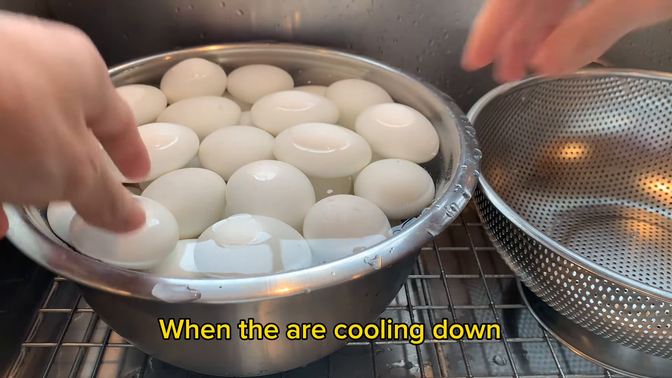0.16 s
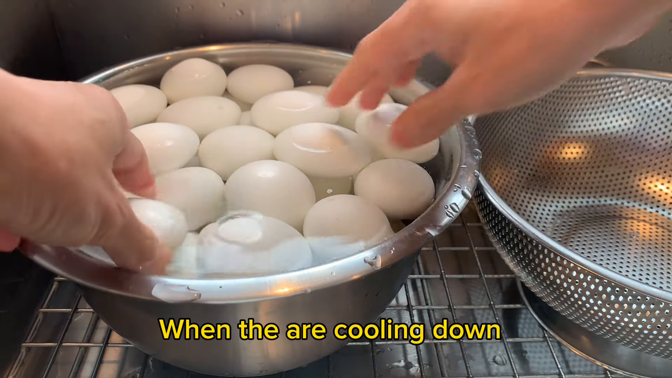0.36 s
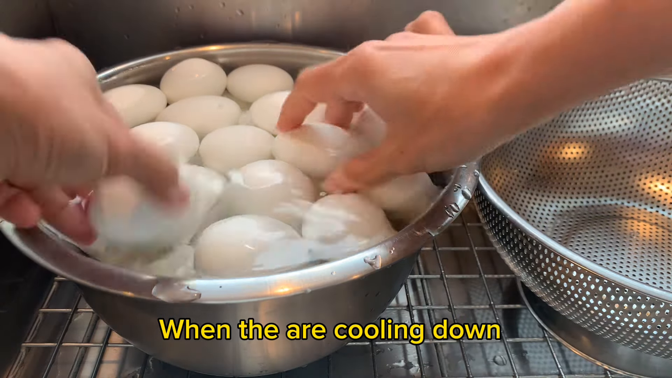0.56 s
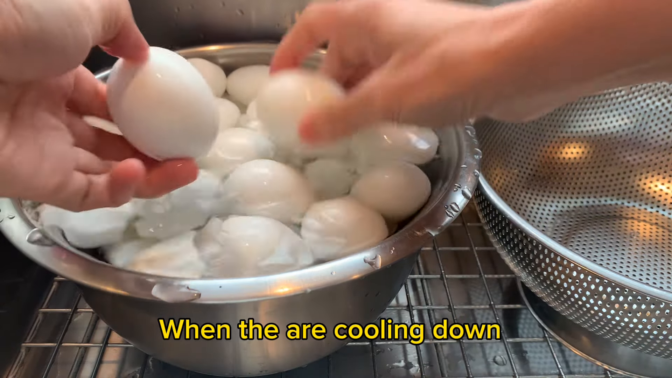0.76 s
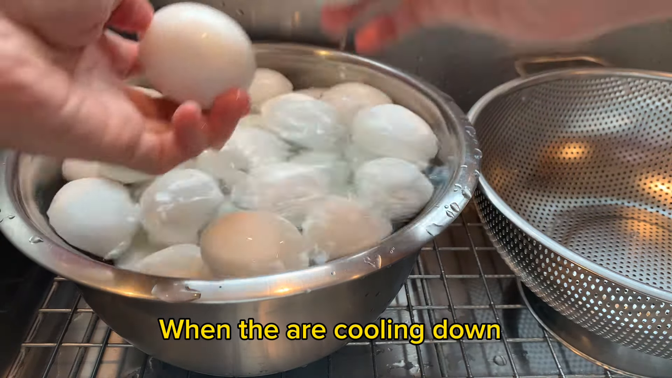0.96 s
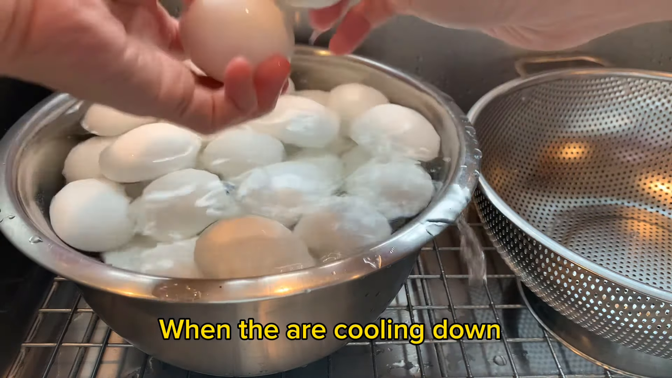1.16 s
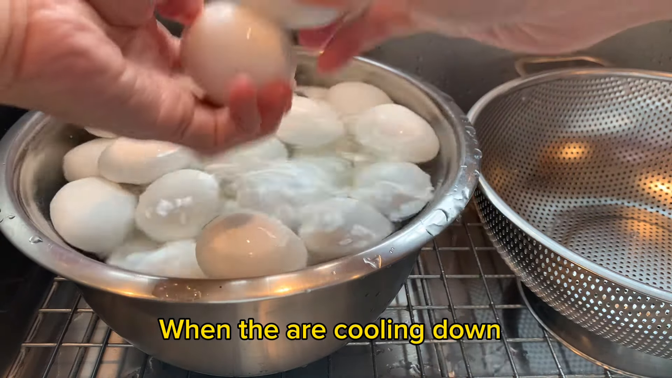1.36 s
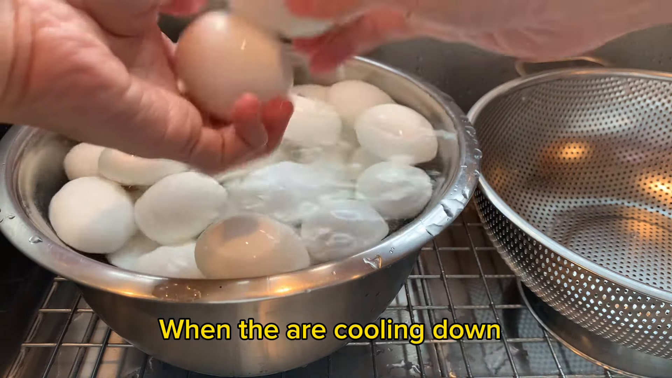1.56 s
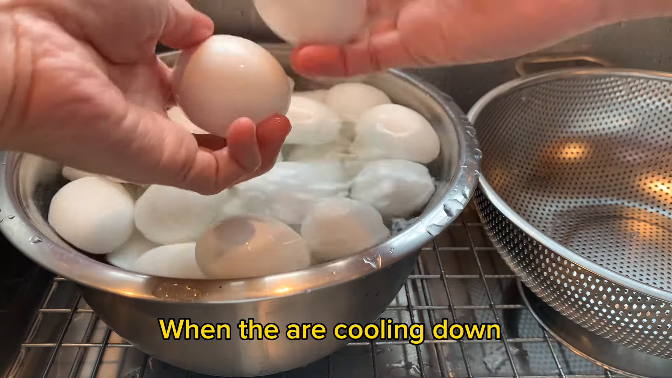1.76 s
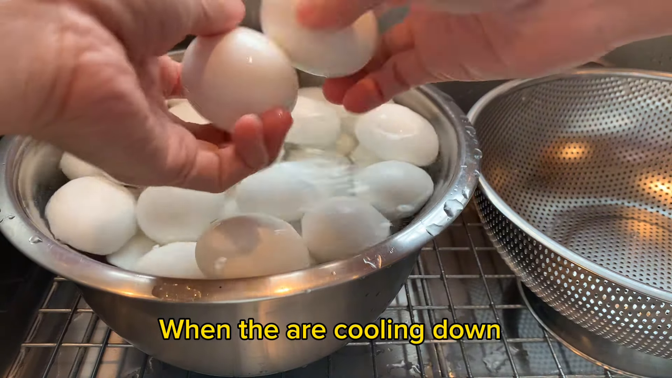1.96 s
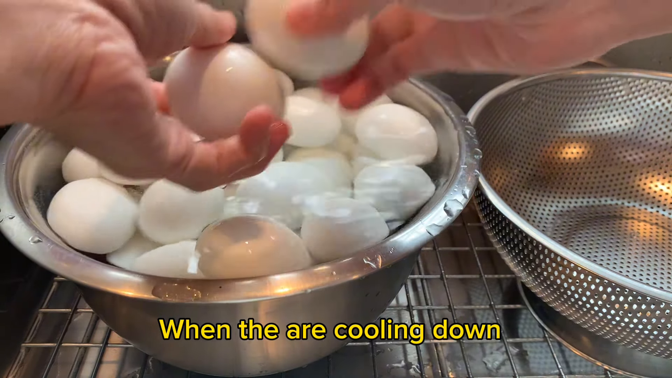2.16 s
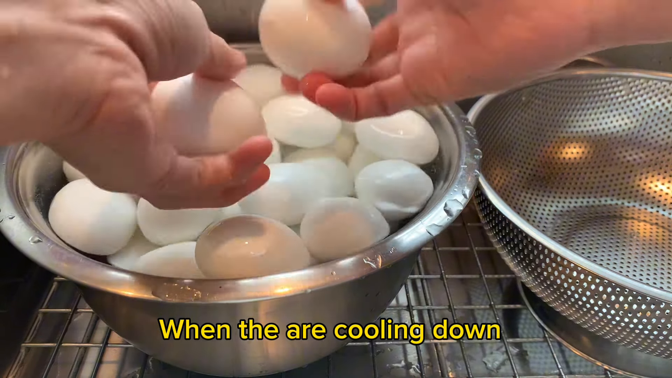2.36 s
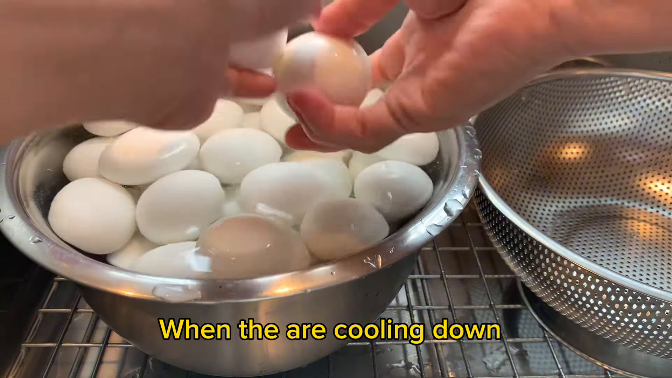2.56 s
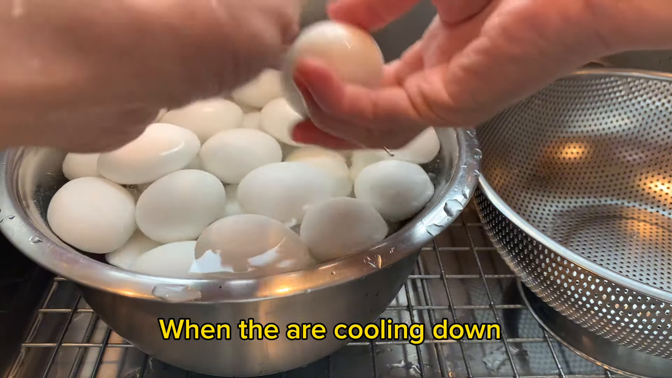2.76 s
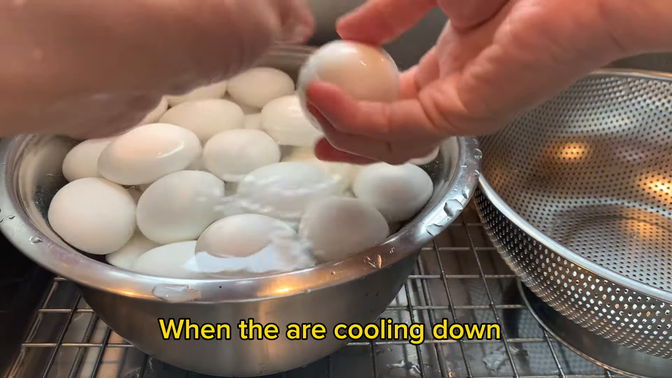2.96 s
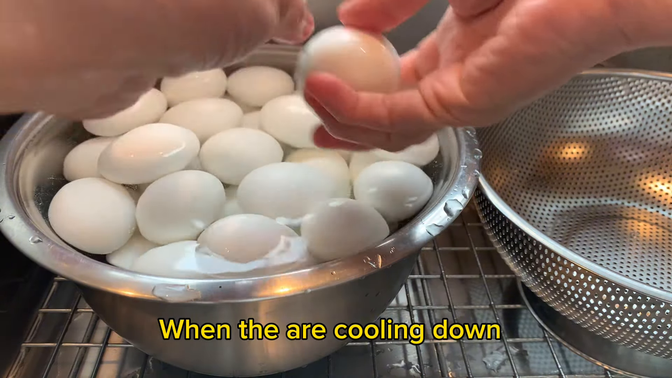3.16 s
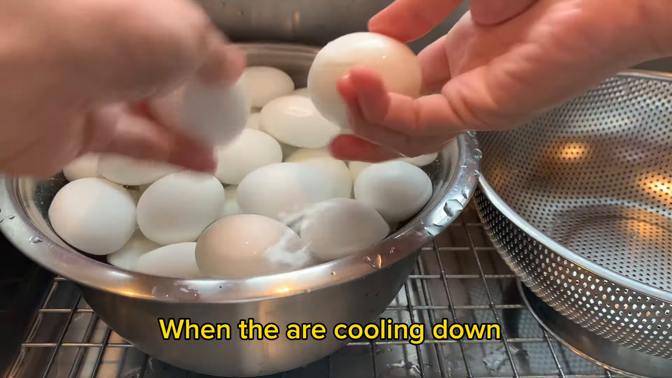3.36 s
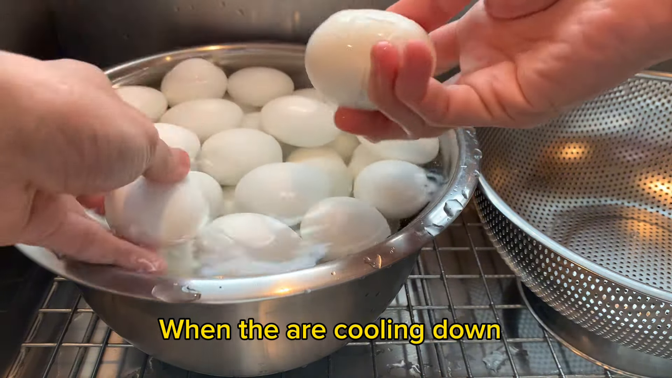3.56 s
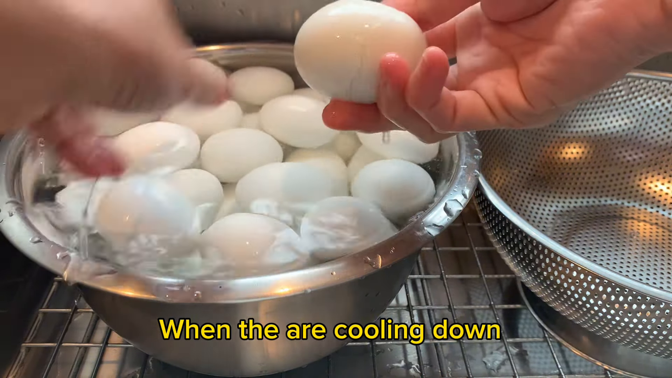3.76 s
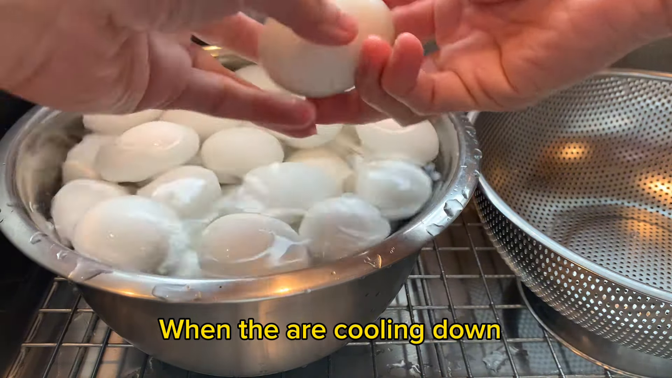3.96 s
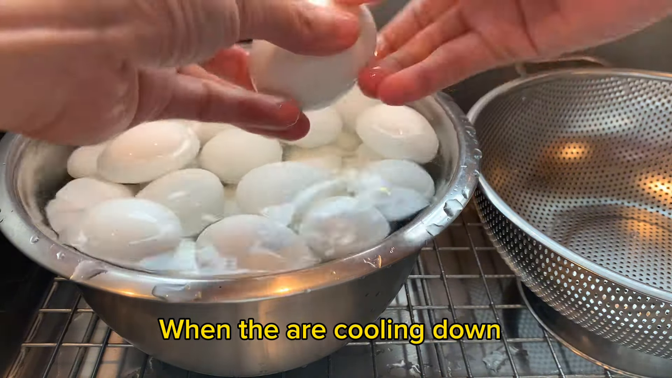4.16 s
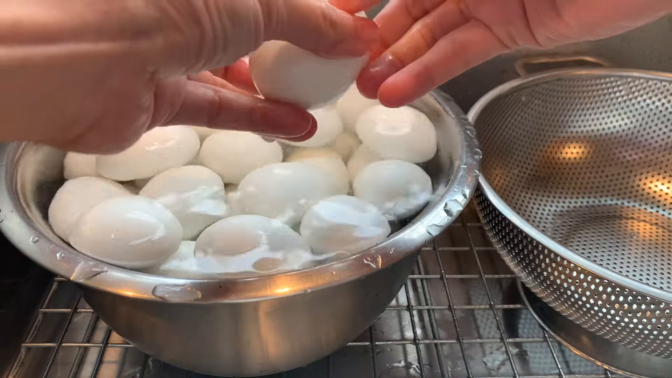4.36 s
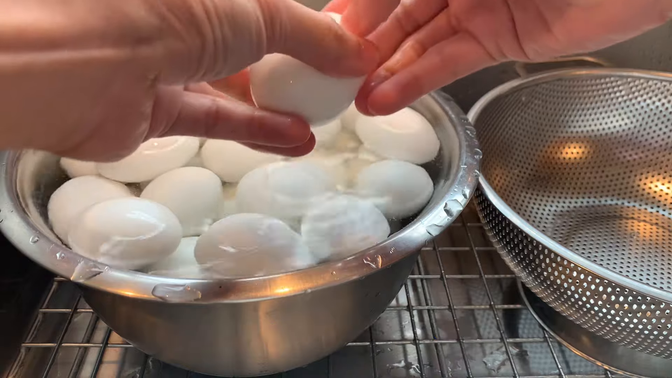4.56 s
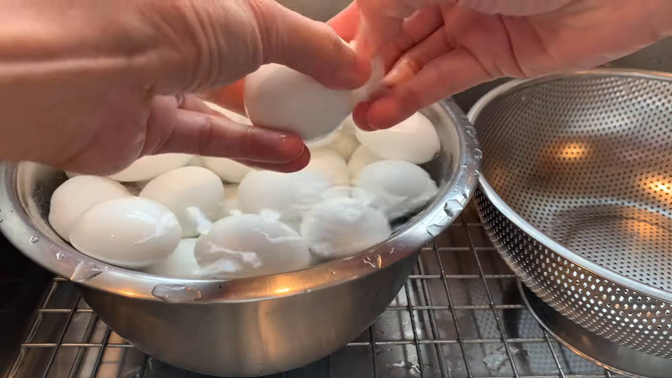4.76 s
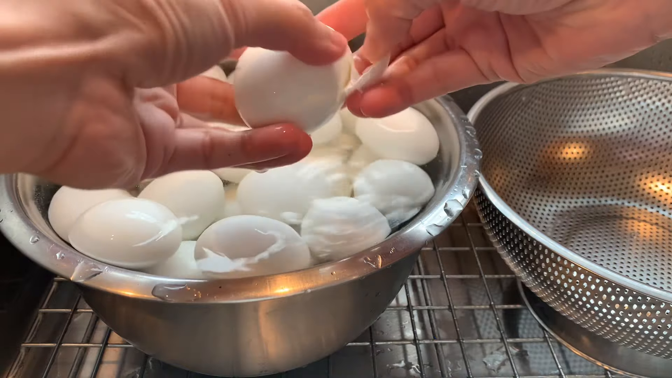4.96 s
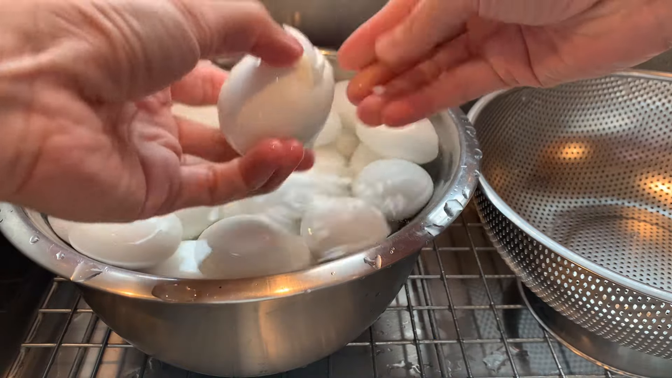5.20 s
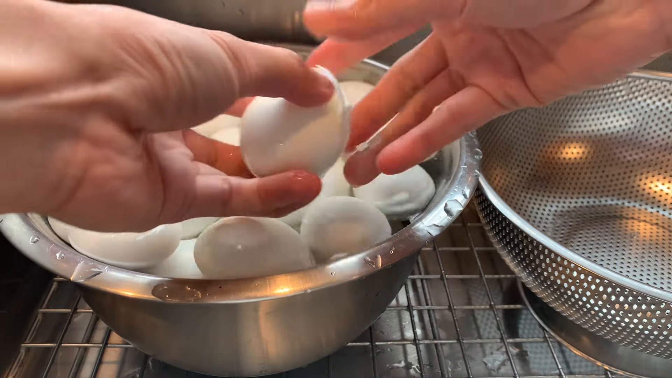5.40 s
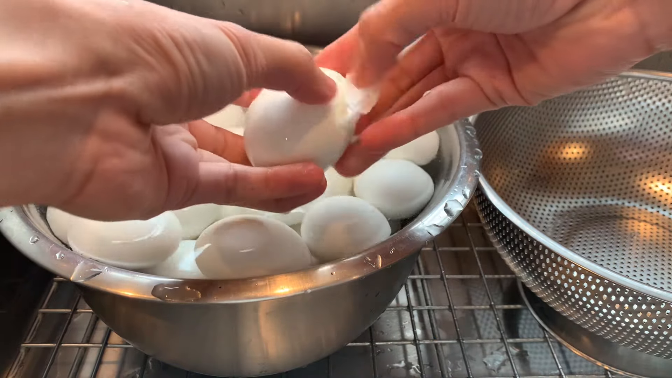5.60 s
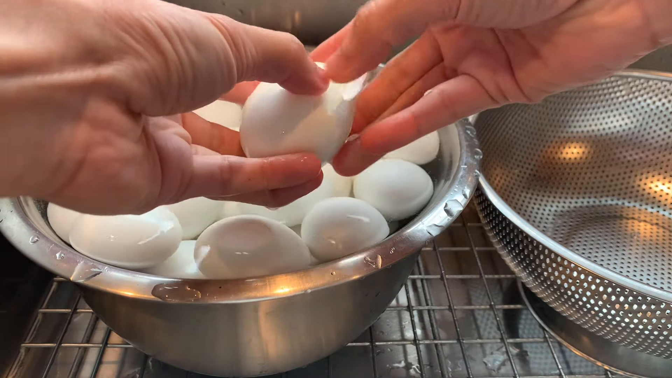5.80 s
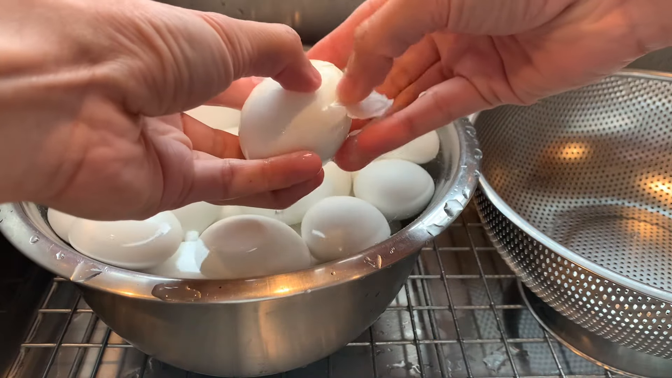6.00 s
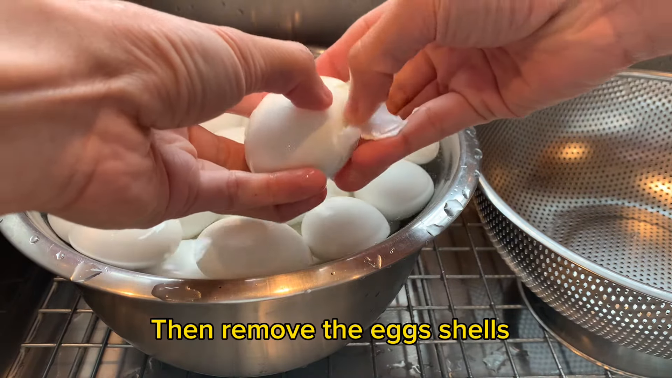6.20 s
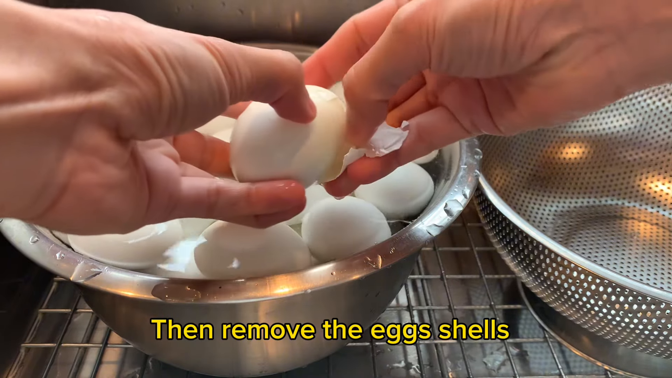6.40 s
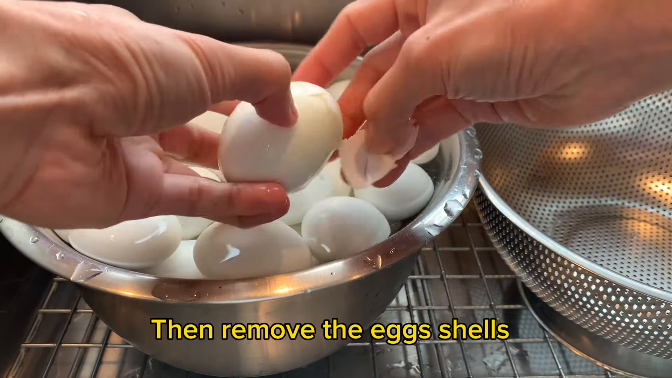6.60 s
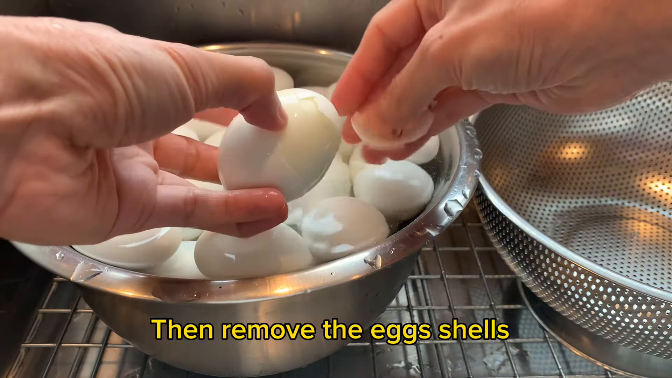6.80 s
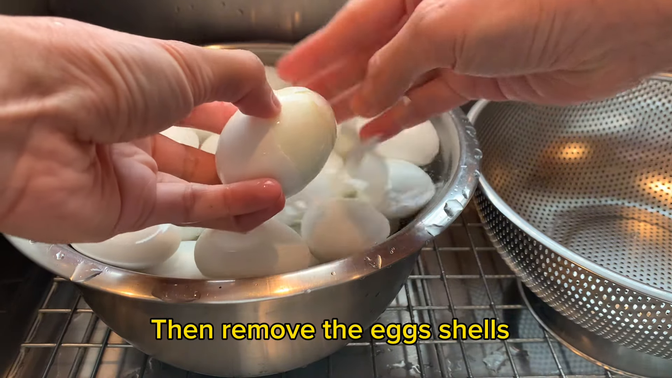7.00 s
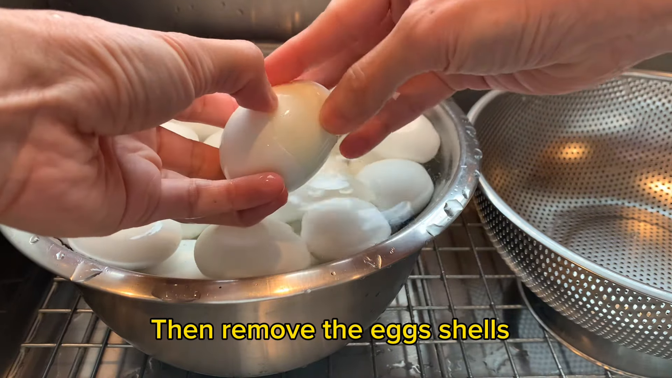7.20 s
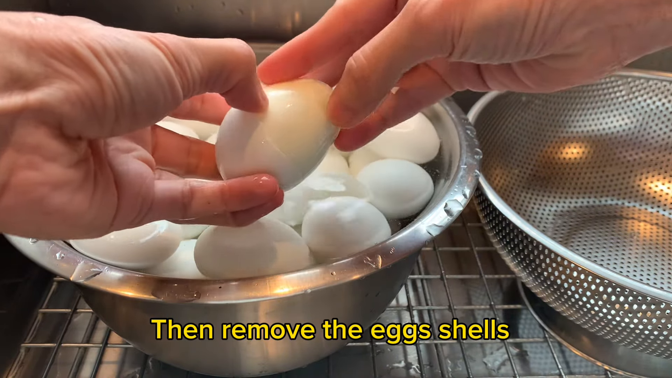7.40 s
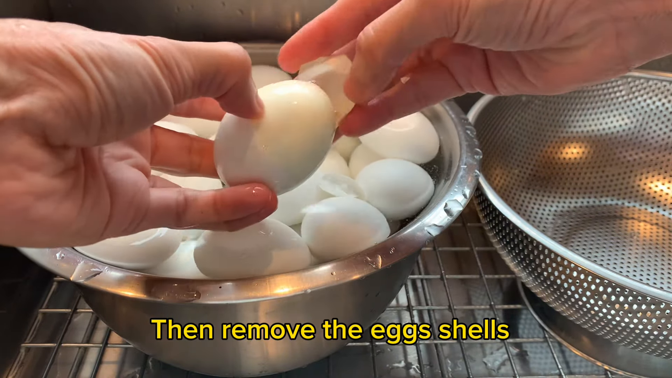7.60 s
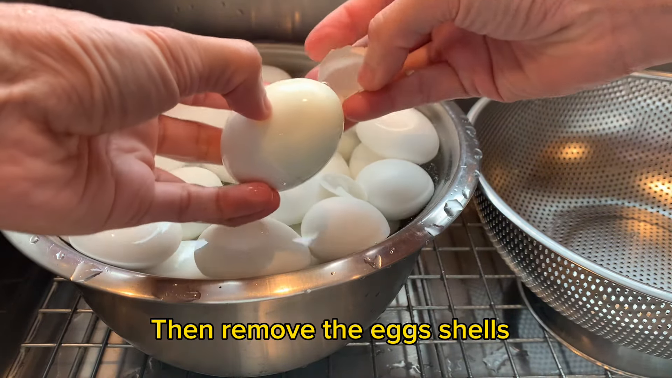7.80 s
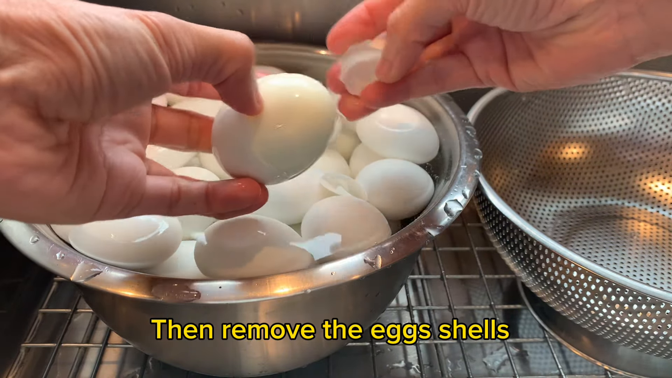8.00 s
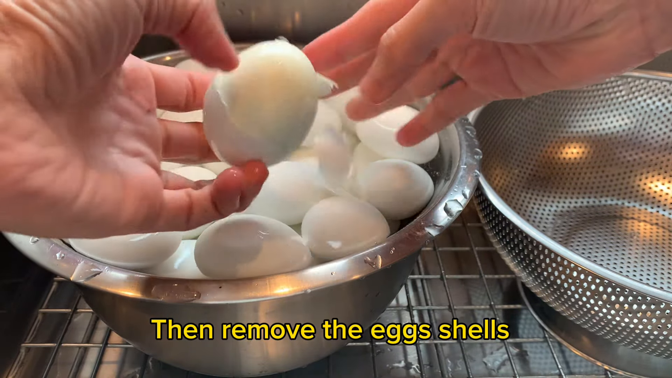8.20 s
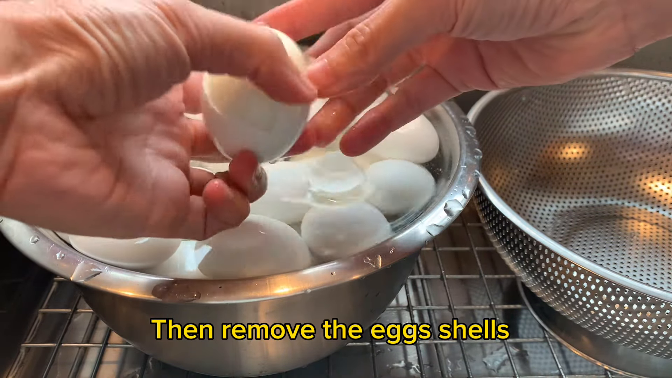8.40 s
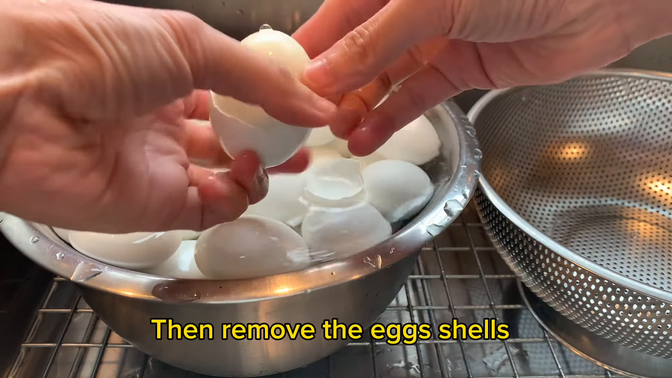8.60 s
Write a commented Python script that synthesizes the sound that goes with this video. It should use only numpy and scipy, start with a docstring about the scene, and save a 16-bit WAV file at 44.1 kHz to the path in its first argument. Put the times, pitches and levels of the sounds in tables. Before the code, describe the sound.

Close stereo sound at a kitchen sink. Hands stir water and boiled eggs in a steel bowl with soft sloshes and bumps, then nine sharp, crunchy knocks break a shell. An egg drops back with a low gulp, thump and faint metallic ring. After a brief lull, shell is squeezed and peeled in irregular bursts of bright crackles and snaps, over faint hum and air noise.

```python
"""A boiled egg is knocked nine times to break its shell, then squeezed and peeled: showers of tiny cracks,
snapping plates of shell and crackling membrane. Water sloshes as eggs are lifted from a steel bowl in a kitchen
sink: shaped noise, air bubbles that ring for a few cycles, and short bumps and splashes. The bowl rings once as
two fading tones. Random echoes stand for the sink and a small room, over steady hum, rumble and air noise."""
import sys
import numpy as np
from scipy import signal
from scipy.fft import rfft, irfft
from scipy.io import wavfile
from scipy.ndimage import uniform_filter1d

SR = 44100
rng = np.random.default_rng(int(sys.argv[2]) if len(sys.argv) > 2 else 0)


def to_wav(s):
    """Save 16-bit WAV."""
    ch = np.atleast_2d(s).T  # columns
    pcm = np.round(np.clip(ch, -1, 1) * 32767)  # PCM
    wavfile.write(sys.argv[1], SR, pcm.astype(np.int16))


N = 381465  # length of the scene [samples]

# tone colour of the firm egg under the shell: (frequency [Hz], level [dB])
EGG_BODY = [(150, -16.5), (500, -9), (900, -9), (1400, 1), (2200, 2.5), (2750, -1), (4500, -12.5),
            (9000, -15.5)]
# tone colour of fine drops on the water surface: (frequency [Hz], level [dB])
SPATTER_COLOUR = [(400, -8), (900, -7), (1800, -9), (3000, -16), (4500, -11), (7000, -21.5), (14000, -23),
                  (16000, -52)]


def undb(db):
    """Turn decibels into a plain multiplier."""
    return 10 ** (np.asarray(db) / 20)


def unit(x):
    """Scale to rms 1."""
    return x / np.sqrt(np.mean(x ** 2) + 1e-20)


def response(points, size=1024):
    """Make a filter of unit energy with the given spectrum that never sounds before its input (minimum phase)."""
    hz, db = np.transpose(points)
    bins = np.maximum(np.arange(size // 2 + 1) * SR / size, 1)
    level_db = np.interp(np.log(bins), np.log(hz), db)
    # folding the cepstrum onto its first half puts the energy as early as possible
    cepstrum = irfft(np.log(undb(level_db)))
    cepstrum[1:size // 2] *= 2
    cepstrum[size // 2 + 1:] = 0
    h = irfft(np.exp(rfft(cepstrum)))
    return h / np.linalg.norm(h)


def colour(x, points):
    """Filter x by a spectrum."""
    return signal.oaconvolve(x, response(points))[:len(x)]


def add(track, s, sound):
    """Lay a sound into a track at time s [s]."""
    i = int(s * SR)
    track[i:i + len(sound)] += sound[:N - i]


def grains(n, per_s, scatter_db):
    """Random tiny impulses of uneven size."""
    chance, size, strength = rng.random(n), rng.standard_normal(n), rng.standard_normal(n)
    happens = chance < per_s / SR
    return happens * size * undb(scatter_db * np.clip(strength, -2, 2))


def burst(x, db):
    """Give a short sound the energy of 8 ms at the level db."""
    return x / np.linalg.norm(x) * np.sqrt(.008 * SR) * undb(db)


def fracture(t, decay_s, rise_s, scatter_db=2):
    """A run of micro-cracks that swells and dies out."""
    swell = 1 - np.exp(-(t / rise_s) ** 2)
    return grains(len(t), 20000, scatter_db) * np.exp(-t / decay_s) * swell


def crunch(cracks, bright_db):
    """Colour cracks as breaking shell; thin splinters get more treble than thick ones."""
    # tone colour of crunching shell: (frequency [Hz], level [dB])
    crunch_colour = [(2700, -38.5), (5000, -11.5), (6500, 1), (8000, 8), (9800, 3.5), (11000, 6),
                     (11900, -6), (13000, 6), (14300, -0.5), (15600, -20), (16500, -30)]
    hz, db = np.transpose(crunch_colour)
    treble = np.clip((hz - 9000) / 4000, 0, 1)  # none below 9 kHz, all of it above 13 kHz
    return colour(cracks, np.transpose([hz, db + bright_db * treble]))


def knocks(crunch_db=0.0, plate_db=1, body_db=-2, thud_db=-6.0, crush_rise_s=0.0032, give_db=11, give_s=0.00059):
    """Each knock crushes a patch of shell until it caves in, and briefly rings two modes of the firm egg under it."""
    # knocks, levels before the gains above; plate and body are relative to the crunch, upper mode to the egg's:
    # (time [s], crunch [dB], brightness [dB], plate ring [dB], egg body [dB], egg mode [Hz], upper mode [Hz],
    # upper mode [dB], delay until the shell caves in [s], crush decay [s])
    knock_list = [(1.15, -13, -4, -9.5, -23.5, 1690, 2140, -5, 0.0029, 0.0043),
                  (1.3783, -22.5, 7, -9.5, -15, 1370, 2000, 10, 0.0031, 0.0065),
                  (1.5786, -23, 7.5, -11.5, -15, 1557, 2210, -2, 0.003, 0.0032),
                  (1.986, -30.5, 7.5, -9.5, -15, 1075, 2050, -2.5, 0.0038, 0.018),
                  (2.2012, -22.5, 7, -12, -16, 1082, 1320, -1, 0.0024, 0.0015),
                  (2.54, -36.5, 7.5, -9.5, -12, 1470, 2030, -9, 0.0068, 0.0044),
                  (2.8073, -23.5, 5.5, -12.5, -10.5, 954, 1603, 4, 0.00437, 0.011),
                  (3.0335, -23.5, 5, -17, -10, 1032, 1630, -8, 0.0026, 0.00059),
                  (3.2272, -27, 11, -27, -11, 1026, 1310, -4.5, 0.0037, 0.015)]
    # tone colour of the plates of shell under a knock: (frequency [Hz], level [dB])
    knock_plate = [(1500, -7), (2800, 3), (3800, 11), (5000, 13), (6000, 11), (7500, -8), (10000, -28.5)]
    egg_ring_s = .0024
    out, t = np.zeros(N), np.arange(4096) / SR
    for s, db, bright, plate, body, hz, upper_hz, upper_db, caves_s, crush_s in knock_list:
        caving_in = 1 + undb(give_db) * np.exp(-((t - caves_s) / give_s) ** 2)
        cracks = fracture(t, crush_s, crush_rise_s) * caving_in
        modes = np.sin(2 * np.pi * hz * t) + undb(upper_db) * np.sin(2 * np.pi * upper_hz * t)
        ring = modes * np.exp(-t / egg_ring_s) * (1 - np.exp(-t / crush_rise_s))
        add(out, s, burst(crunch(cracks, bright), db + crunch_db))
        add(out, s, burst(colour(cracks, knock_plate), db + plate + plate_db))
        add(out, s, burst(ring, db + body + body_db))
        add(out, s, burst(colour(cracks, EGG_BODY), db + body + thud_db))
    return out


def plate_pitch(s):
    """Pitch [Hz] of the loose plate of shell at time s [s]."""
    # how the plate's pitch moves during the peeling: (time [s], pitch [Hz])
    pitch_points = [(1.25, 5410), (4.45, 3995), (4.63, 3920), (4.69, 3670), (4.78, 4160), (4.86, 4420),
                    (5.6, 4700), (6.25, 4280), (6.42, 4040), (6.55, 3920), (7.06, 4090), (7.4, 4840),
                    (7.47, 4100), (7.65, 4050), (8.23, 4400)]
    return np.interp(s, *np.transpose(pitch_points))


def snaps(crunch_db=0, plate_db=6.5, body_db=0, first_db=0, size_spread=0.026, uneven_db=1.0):
    """A plate of shell gives with one sharp break, then splinters; size and ragged shape set its pitch and colour."""
    # loud snaps, levels before the gains above; plate and body are relative to the crunch:
    # (time [s], crunch [dB], brightness [dB], plate ring [dB], egg body [dB], splintering decay [s])
    snap_list = [(1.295, -36.5, 17, -23, -34, 0.0023), (1.348, -51, 1, -4, -28, .001),
                 (2.648, -52.5, 8, -15, -27.5, .003), (3.419, -59, 19, -36, -36.5, 0.0011),
                 (3.484, -36.5, 19.5, -31.5, -28.5, 0.00074), (4.448, -58, 16, -18, 15.5, 0.0015),
                 (4.494, -52.5, 6, -16, 1, 0.0059), (4.625, -43.5, 10, -6, -12, .002),
                 (4.634, -33.5, 17, -15, -19, 0.0017), (4.686, -46, 0, 1.5, -22, 0.004),
                 (4.74, -48.5, 17, -5, -1, 0.0022), (4.766, -23, 0, -10, -16, 0.0067),
                 (4.772, -25.5, -7, -3.5, -19.5, 0.015), (4.78, -32, 12, -7, -13, 0.0025),
                 (4.794, -24.5, 5, -25, -16, 0.0069), (4.816, -32, 0, -28, -20, 0.00092),
                 (4.852, -34, -5, -13, -12.5, 0.0011), (4.86, -37.5, 9, -12, -24, 0.0022),
                 (4.951, -35.5, 11, -22, -21, 0.0029), (4.968, -35, 10, -22, -19, 0.0023),
                 (4.976, -37.5, 5, -26, -19.5, 0.0012), (4.99, -32.5, 13, -32, -26, 0.0048),
                 (4.997, -31, 11, -33, -22.5, 0.033), (5.036, -35, 24, -35, -28, 0.002),
                 (5.044, -35, 28, -37, -35, 0.00096), (5.104, -36, 16, -25, -24, 0.012),
                 (5.198, -45.5, 10, -20, -22, 0.0023), (5.216, -40, 5, -17.5, -20, 0.00054),
                 (5.586, -40, 27, -16, -35, 0.0017), (5.639, -29, 0, -13, -21, 0.0022),
                 (5.797, -53.5, 7, -21, -25, 0.003), (5.926, -51, 3, -18, -12.5, 0.0022),
                 (6.254, -47.5, 9, -5.5, -28, 0.0011), (6.375, -42, -1, -4.5, -10, 0.0016),
                 (6.392, -29.5, -2, -8.5, -17.5, 0.0013), (6.414, -31.5, 2, -3.5, -40, 0.00049),
                 (6.47, -53.5, -1, 6, -21, .001), (6.489, -38.5, 2, -21, -6, 0.0017),
                 (6.529, -28, -8, -14.5, -17, 0.011), (6.545, -21.5, 9.5, -25.5, -26, 0.0048),
                 (6.65, -32, 11, -23, -13.5, 0.017), (6.669, -32.5, -39, -23, -32, 0.0033),
                 (6.807, -35, 7, -45, -31, 0.00087), (6.873, -42, -5, -33, -26, .0015),
                 (6.91, -44, 1, -20.5, -11.5, 0.001), (7.062, -33.5, 3.5, -12.5, -15.5, 0.0056),
                 (7.258, -49.5, -8.5, -5.5, -26.5, 0.0014), (7.339, -50.5, 5, -13.5, -34, 0.0017),
                 (7.38, -50.5, 13, -5.5, -26, 0.00077), (7.404, -51, -1, 0.5, -30, 0.00087),
                 (7.427, -48, 10, -6.5, -36, 0.001), (7.443, -44.5, 10, -4, -34, 0.00093),
                 (7.456, -31, 11, -10, -36, 0.0007), (7.482, -33.5, 13, -37, -11, 0.0048),
                 (7.492, -29.5, 17, -32, -27, 0.00079), (7.498, -35, 7, -37, -9.5, 0.0018),
                 (7.623, -36, 15, -33, -24, 0.0015), (7.636, -42, 14, -3.5, -30, 0.0039),
                 (7.655, -43, 10, -10, -22, .001), (7.663, -47, 16, -8, -31, 0.0017),
                 (7.712, -38, 14, -20, -8, 0.0058), (7.747, -35.5, 10, -7.5, -31, 0.0057),
                 (7.777, -48.5, 6, -7.5, -30, .001), (7.851, -42, 6, -14, -22, 0.0007),
                 (7.893, -44, 1, -35, -22, 0.0012), (7.931, -38.5, 7, -8.5, -16.5, 0.02),
                 (7.955, -38.5, 7, -11, -25, .002), (8.052, -47.5, 3, -17, -14, .001),
                 (8.087, -46.5, 12, -28, -22, .0007), (8.229, -36.5, 2, -3.5, -6.5, 0.0028),
                 (8.27, -48.5, 0, -10, -12, 0.0028)]
    # tone colour of a ringing plate: (multiple of the plate's pitch, level [dB])
    plate_colour = [(.4, -26), (.68, -22), (.79, -9), (.88, 5), (1, 9), (1.25, 6), (1.7, -12), (2.4, -45)]
    out, t = np.zeros(N), np.arange(2048) / SR
    shape_hz = np.geomspace(700, 16000, num=24)
    for s, db, bright, plate, body, decay_s in snap_list:
        size = rng.uniform(-1, 1)
        cracks = fracture(t, decay_s, 0.00019)
        cracks[20] += undb(first_db) * np.linalg.norm(cracks[:128])  # the sharp break
        ragged_db = uneven_db * rng.standard_normal(len(shape_hz))
        cracks = colour(cracks, np.transpose([shape_hz, ragged_db]))
        pitch = plate_pitch(s) * np.exp(-size_spread * size)  # larger plates ring lower
        shard = np.array(plate_colour) * [pitch, 1]
        add(out, s, burst(crunch(cracks, bright), db + crunch_db))
        add(out, s, burst(colour(cracks, shard), db + plate + plate_db))
        add(out, s, burst(colour(cracks, EGG_BODY), db + body + body_db))
    return out


def tugging(lead_s=.1):
    """Each tug builds, holds in uneven jerks and lets go; gives the strength of the crackle and of the plate ring."""
    # tugs that tear shell from its membrane; the first two rows are the ringing tail of the first knock;
    # levels before the gains in peeling(): (start [s], length [s], crackle [dB], plate ring [dB])
    tug_list = [(1.147, 0.087, -53, -44.5), (1.26, 0.11, -63, -46.5), (4.412, 0.15, -57, -63.5),
                (4.606, 0.044, -36.5, -41), (4.65, 0.046, -48, -45), (4.752, 0.05, -36, -38.5),
                (4.808, 0.18, -48, -59), (4.945, 0.11, -40.5, -49.5), (5.085, 0.058, -38, -47),
                (5.574, 0.095, -36.5, -43), (5.672, 0.034, -52, -57), (5.88, 0.046, -42.5, -54),
                (6.137, 0.1, -53.5, -62.5), (6.295, 0.068, -45, -49), (6.393, 0.11, -42.5, -39),
                (6.531, 0.02, -36, -29), (6.663, 0.007, -28, -38.5), (6.756, 0.11, -47.5, -61.5),
                (7.38, 0.06, -49, -59), (7.446, 0.067, -39, -39.5), (7.528, 0.16, -47.5, -55.5),
                (7.618, 0.062, -31, -40.5), (7.679, 0.094, -36.5, -44.5), (7.795, 0.189, -43, -48.5),
                (8.007, 0.126, -45.5, -54), (8.23, 0.055, -82, -47.5)]
    build_s, release_s = 0.013, 0.0041
    jerks_per_s, jerk_db = 110, 4
    t, tracks = np.arange(SR // 2) / SR - lead_s, np.zeros((2, N))
    for s, length, crackle_db, ring_db in tug_list:
        before, after = np.maximum(-t, 0), np.maximum(t - length, 0)
        grip = np.exp(-before / build_s - after / release_s)
        for track, db in zip(tracks, (crackle_db, ring_db)):
            add(track, s - lead_s, undb(db) * grip)
    knots = np.arange(0, N, SR / jerks_per_s)
    jerks = np.interp(np.arange(N), knots, jerk_db * rng.uniform(-2, 1.7, len(knots)))
    return tracks * unit(undb(jerks))


def slips(strength, pitch, ring_cycles=3.5):
    """A random run of tiny flakes coming free, each ticking at the pitch of its moment."""
    out, t = np.zeros(N), np.arange(256) / SR
    sizes = unit(grains(N, per_s=850, scatter_db=4.5)) * strength
    for i in np.flatnonzero(np.abs(sizes) > 1e-4):  # skip the faintest
        cycles = pitch[i] * t
        tick = np.sin(2 * np.pi * cycles) * np.exp(-2 * cycles / ring_cycles)
        add(out, i / SR, sizes[i] * tick / np.linalg.norm(tick))
    return out


def peeling(crackle_db=-9, plate_db=-4.5, body_db=-22, bright_db=2, lowest_hz=3650, flake_scatter_db=4):
    """The membrane lets go in slips: tiny flakes tick brightly, larger ones ring the loose plate and the egg."""
    pull, ring = tugging()
    small = unit(grains(N, 890, flake_scatter_db)) * pull
    low = slips(ring, rng.uniform(900, 2100, N), ring_cycles=1.5)
    large = slips(ring, plate_pitch(np.arange(N) / SR) * rng.uniform(.85, 1.35, N))
    highpass = signal.butter(6, lowest_hz, "highpass", fs=SR, output="sos")
    large = signal.sosfilt(highpass, large)
    return undb(crackle_db) * crunch(small, bright_db) + undb(plate_db) * large + undb(body_db) * low


def plops(plop_s=0.006, splash_s=0.0072):
    """Mostly wet eggs nudging each other or the bowl: a short pip or a low thump, and a small splash."""
    # nudges, bumps and drops falling back; at 3.566 s a snap of shell:
    # (time [s], pip or thump level [dB], pitch [Hz], splash level [dB])
    plop_list = [(0.355, -45, 1430, -53), (0.377, -38.5, 136.4, -70), (.604, -52, 2270, -55),
                 (0.817, -47.5, 3140, -63), (0.841, -58, 3450, -51.5), (.861, -41, 3000, -55),
                 (0.866, -43.5, 2500, -64), (0.933, -53, 1400, -52), (0.964, -47, 145, -51),
                 (0.987, -44, 120, -49), (1.032, -49, 115, -81), (1.315, -38.5, 125, -67),
                 (1.346, -45.5, 133.6, -75), (3.566, -33, 4560, -41.5), (3.633, -54, 1530, -57),
                 (3.732, -61, 1380, -51), (3.808, -45, 1780, -37.5), (3.825, -42, 121, -65),
                 (3.877, -50, 1905, -36.5), (3.904, -30.5, 138, -70), (3.922, -49, 1510, -41),
                 (3.949, -32, 128.3, -77), (3.975, -45, 868, -38.5), (4.03, -50.5, 1530, -47),
                 (4.408, -64, 3740, -47)]
    out, t = np.zeros(N), np.arange(4096) / SR
    onset = 1 - np.exp(-t / 0.000095)
    for s, db, hz, splash_db in plop_list:
        # low thumps last longer than high pips; plop_s holds at 1500 Hz
        decay_s = plop_s * (1500 / hz) ** 0.67
        pip = np.sin(2 * np.pi * hz * t) * np.exp(-t / decay_s)
        splash = colour(rng.standard_normal(len(t)) * np.exp(-t / splash_s), SPATTER_COLOUR)
        add(out, s, (undb(db) * pip + undb(splash_db) * splash) * onset)
    return out


def gulps(swell_cycles=0.67, glide=.04):
    """Water closes over an egg: a pocket of air swells, rings for a few cycles and rises in pitch."""
    # gulps of trapped air: (time [s], peak level [dB], starting pitch [Hz])
    gulp_list = [(0.387, -44.5, 240), (0.53, -61, 201), (0.69, -53.5, 290), (0.945, -42, 423),
                 (0.968, -50, 315), (0.99, -53, 230), (1.041, -47, 187), (1.102, -52, 340),
                 (3.82, -36, 205), (3.833, -31, 324), (3.843, -44, 450), (3.885, -44, 336),
                 (3.932, -48, 454), (3.958, -46, 298), (4.016, -41.5, 267), (4.058, -43, 201),
                 (4.161, -50, 236.5)]
    out, t = np.zeros(N), np.arange(8192) / SR
    for s, db, hz in gulp_list:
        cycles = hz * t
        age = cycles / swell_cycles
        swell = age * np.exp(1 - age)
        add(out, s, undb(db) * swell * np.sin(2 * np.pi * cycles * (1 + glide * age)))
    return out


def surging():
    """Each surge rises quickly and settles; gives the strength of slosh, gurgle and spray."""
    # surges as hands and eggs move in the bowl, levels before the gains in water():
    # (time [s], slosh [dB], gurgle [dB], spray [dB], settling time [s])
    surge_list = [(0.267, -60, -67, -59, 0.072), (0.362, -48, -60, -93, 0.09),
                  (0.495, -52, -62.5, -59.5, 0.18), (0.657, -59, -63, -65.5, 0.3),
                  (0.921, -45.5, -48, -61, 0.018), (0.955, -44, -60, -92, 0.075),
                  (1.086, -51.5, -54.5, -78, 0.094), (1.31, -60, -65, -67, 0.65),
                  (3.574, -47.5, -75, -54.5, 0.054), (3.734, -47, -53.5, -65, 0.046),
                  (3.818, -33, -44, -71, 0.042), (3.883, -43.5, -51, -73, 0.19),
                  (3.98, -46.5, -70, -68, 0.045)]
    rise_s = 0.0031
    tracks, t = np.zeros((3, N)), np.arange(SR) / SR
    for s, slosh_db, gurgle_db, spray_db, settle_s in surge_list:
        wave = (1 - np.exp(-t / rise_s)) * np.exp(-t / settle_s)
        for track, db in zip(tracks, (slosh_db, gurgle_db, spray_db)):
            add(track, s, undb(db) * wave)
    return tracks


def bubbles(low_hz, high_hz, cycles, count):
    """Small air pockets that each ring for a few cycles, rising in pitch."""
    out, t = np.zeros(N), np.arange(2048) / SR
    for when, size, strength in rng.random((count, 3)):
        hz = low_hz * (high_hz / low_hz) ** size
        age = t * hz / cycles
        rise = 1 + 0.0059 * np.minimum(age, 6)
        ring = np.exp(-age) * np.sin(2 * np.pi * cycles * age * rise)
        add(out, when * (N - 1) / SR, undb(-14 * strength) * ring)
    return unit(out)


def water(slosh_db=0.0, gulp_db=-8, spatter_db=-8, gurgle_db=-6, spray_db=-4):
    """Sloshing and low gulps between the eggs, gurgling bubbles, and fine spatter and spray at the surface."""
    # tone colour of the slosh: (frequency [Hz], level [dB])
    slosh_colour = [(40, -14), (80, 9.5), (140, 4.5), (300, -2), (480, -3.5), (700, -22.5), (1500, -50.5)]
    # tone colour of the spray: (frequency [Hz], level [dB])
    spray_colour = [(2500, 1), (5000, 3), (7500, 9), (10500, 3), (11900, -9), (13300, 1.5), (15000, -11.5),
                    (16500, -24.5)]
    flow, stir, spray_strength = surging()
    slosh = undb(slosh_db) * colour(unit(grains(N, 3000, 0.93)) * flow, slosh_colour)
    low_gulps = undb(gulp_db) * flow * bubbles(90, 480, 5.1, count=1500)
    spatter = undb(spatter_db) * colour(unit(grains(N, 2700, 1.8)) * stir, SPATTER_COLOUR)
    gurgle = undb(gurgle_db) * stir * bubbles(850, 2900, 5.0, count=3000)
    spray = undb(spray_db) * colour(unit(grains(N, 2200, 2.9)) * spray_strength, spray_colour)
    return slosh + low_gulps + spatter + gurgle + spray


def bowl(struck_s=3.885):
    """The dropped egg sets the steel bowl ringing faintly."""
    # the bowl's tones: (frequency [Hz], peak level [dB], time to fall by 60 dB [s])
    bowl_tones = [(1117, -54, 1.4), (1420, -60, 0.29)]
    out, t = np.zeros(N), np.arange(SR) / SR
    for hz, db, t60 in bowl_tones:
        fade = np.exp(-np.log(1000) * t / t60)
        add(out, struck_s, undb(db) * np.sin(2 * np.pi * hz * t) * fade)
    return out


def echoes(size, per_s, decay_s, onset_s):
    """Spectrum of a cloud of reflections that builds and dies, with unit energy."""
    t = np.arange(size) / SR
    build = 1 - np.exp(-(t / onset_s) ** 2)
    h = grains(size, per_s, 0.11) * np.exp(-t / decay_s) * build
    return rfft(h) / np.linalg.norm(h)


def sink(x, sink_db=-9, size=4096):
    """The short way to two channels: quick random echoes off sink, bowl and hands, redrawn steadily and crossfaded."""
    # share of the energy that reaches each channel by its own paths: (frequency [Hz], share [0-1])
    apart_points = [(200, 0.01), (600, 0.06), (2000, 0.6), (6000, 0.8), (8000, 0.5), (11000, 0.3),
                    (16000, 1)]
    redraw_s = .18  # the echoes are redrawn at this interval
    lowest_hz = 900  # waves longer than the sink pass it by
    sink_decay_s, sink_onset_s = .008, .0025
    hand_decay_s, hand_onset_s = .002, .0014
    left_lag_s, right_lag_s = .0003, 0
    hz = np.arange(size // 2 + 1) * SR / size
    apart = np.clip(np.interp(hz, *np.transpose(apart_points)), 0, 1)
    reflected = undb(sink_db) * hz / np.hypot(hz, lowest_hz)
    out, step = np.zeros((2, N)), int(redraw_s * SR)
    fade = signal.windows.hann(2 * step, sym=False)
    for start in range(-step, N, step):
        first = max(start, 0)
        piece = x[first:start + 2 * step]
        piece = piece * fade[first - start:][:len(piece)]
        near = 1 + reflected * echoes(size, 9800, sink_decay_s, sink_onset_s)
        for channel, lag_s in zip(out, (left_lag_s, right_lag_s)):
            # the right channel hears the treble first; the deep bass reaches both nearly alike
            delay = np.exp(-2j * np.pi * hz * lag_s * np.minimum(hz / 2500, 1))
            # hands and bowl scatter the sound differently to each channel; its broad spectrum is levelled
            scattered = echoes(size, 23000, hand_decay_s, hand_onset_s)
            scattered /= np.sqrt(uniform_filter1d(np.abs(scattered) ** 2, size=50))
            path = irfft(np.sqrt(1 - apart) * near * delay + np.sqrt(apart) * scattered)
            # half a sample guards against rounding down
            add(channel, (first + .5) / SR, signal.fftconvolve(piece, path[:size // 2]))
    return out


def room(x, walls_db=-14, room_db=-14, room_t60=0.41, size=32768):
    """The long way to one channel, by the near walls and the kitchen."""
    # tone colour of what the kitchen gives back: (frequency [Hz], level [dB])
    room_colour = [(300, 0), (750, 0), (1100, 3), (2000, 3.5), (4000, 4), (8000, -0.5), (13000, -1),
                   (17000, -1.5)]
    walls = undb(walls_db) * echoes(size, 10000, decay_s=0.0058, onset_s=0.022)
    kitchen = undb(room_db) * echoes(size, 14000, decay_s=room_t60 / np.log(1000), onset_s=0.0026)
    return signal.oaconvolve(colour(x, room_colour), irfft(walls + kitchen))[:N]


def background(rumble_db=-66, waver=0.2, air_db=-65.5, side_db=2.5):
    """A wavering appliance hum and low rumble, alike in both channels, under soft diffuse air noise."""
    # appliance hum: (frequency [Hz], rms level before wavering [dB])
    hum_tones = [(59.2, -57.5), (87, -88), (131, -64.5), (196, -83), (335, -88), (414.5, -78), (534, -73)]
    # tone colour of the air noise: (frequency [Hz], level [dB])
    air_colour = [(100, 4), (200, -2), (400, -2.5), (550, -2), (780, -9.5), (1000, -8), (1400, -13),
                  (2000, -12), (3000, -22.5), (5000, -23.5), (8000, -30.5), (10300, -23.5), (11800, -36),
                  (13200, -25.5), (16000, -51.5)]
    t, hum = np.arange(N) / SR, 0
    knots = np.arange(0, N / SR + 1, .12)
    for hz, db in hum_tones:
        swell, drift = (np.interp(t, knots, rng.standard_normal(len(knots))) for _ in range(2))
        tone = np.sin(2 * np.pi * hz * t + 0.11 * drift)
        hum = hum + np.sqrt(2) * undb(db) * (1 + waver * swell) * tone
    low = signal.butter(3, [47, 150], "bandpass", fs=SR, output="sos")
    rumble = undb(rumble_db) * unit(signal.sosfilt(low, rng.standard_normal(N)))
    mid, side = (unit(colour(rng.standard_normal(N), air_colour)) for _ in range(2))
    # the side noise has opposite signs left and right, which spreads the air wide above the bass
    highpass = signal.butter(1, 450, "highpass", fs=SR, output="sos")
    side = undb(side_db) * signal.sosfilt(highpass, side)
    return hum + rumble + undb(air_db) * (mid + np.array([side, -side]))


def scene():
    """Shell and water in the sink, over the kitchen's background."""
    soft = peeling() + plops() + gulps() + water()
    # a breaking shell radiates a different crack in each direction
    front, left, right = (soft + knocks() + snaps() for _ in range(3))
    return sink(front) + np.array([room(left), room(right)]) + bowl() + background()


def record(dry, top_hz=16300):
    """A steep low-pass filter cuts the highest treble."""
    return signal.sosfilt(signal.ellip(8, .2, 70, top_hz, fs=SR, output="sos"), dry)


dry = scene()
out = record(dry)
to_wav(out)
```